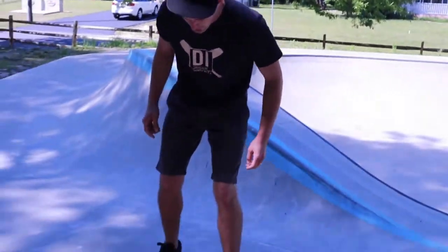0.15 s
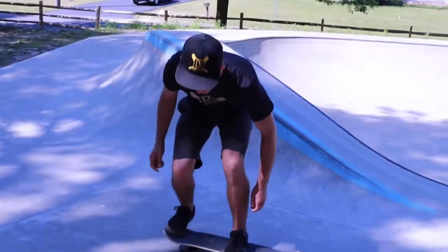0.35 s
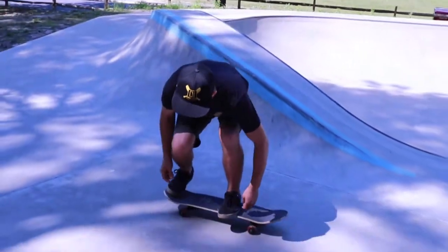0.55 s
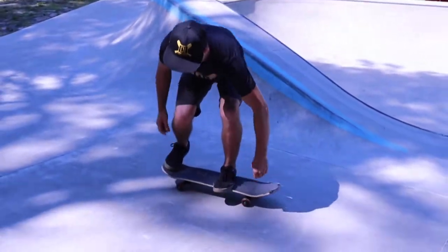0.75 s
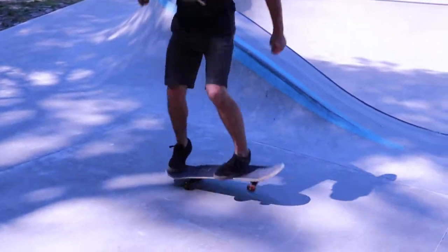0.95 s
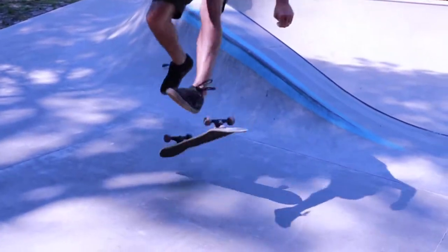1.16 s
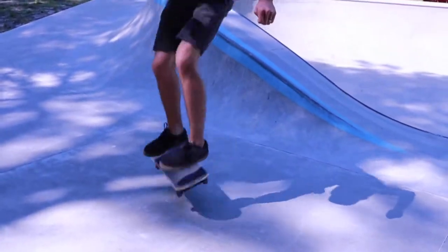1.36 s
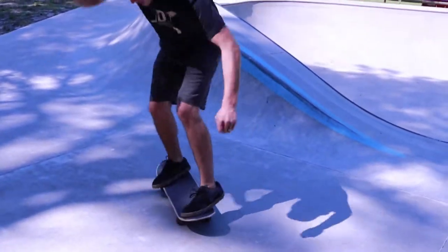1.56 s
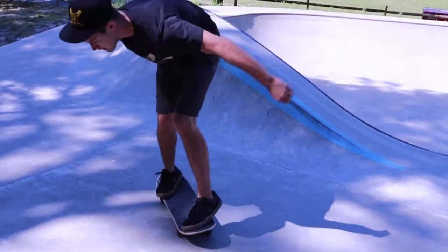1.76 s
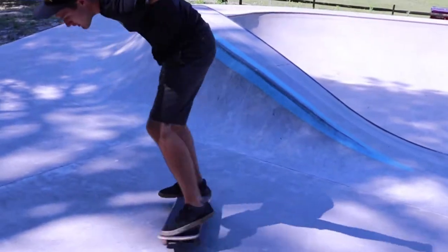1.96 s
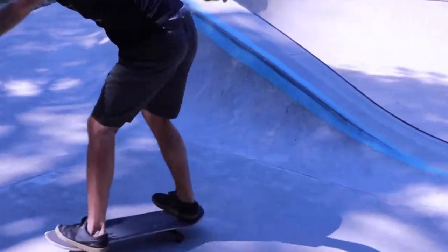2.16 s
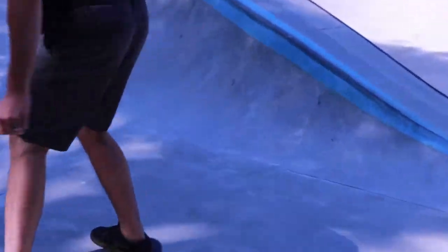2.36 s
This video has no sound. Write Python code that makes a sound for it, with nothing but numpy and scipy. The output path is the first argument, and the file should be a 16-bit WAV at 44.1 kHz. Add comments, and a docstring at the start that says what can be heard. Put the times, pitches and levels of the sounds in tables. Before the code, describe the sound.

A skateboard cracks off concrete, slaps down in a rapid clatter, knocks again and squeaks briefly

```python
"""In a concrete bowl, a skater pops a flip and lands it, a few metres from a microphone whose input clips.
Blows ring the modes of the wooden deck; granular noise gives shoe scuffs and late swells of the echo.
The sole creaks on the grip tape, grit ticks as noise bursts, rubber chirps as gliding tones, and a wheel
squeals as stick-slip partials. The park also scatters the board's sound back through a diffuse tail;
wheels roll softly and wind rumbles, both as shaped noise over hiss."""
import sys
import numpy as np
from scipy import signal
from scipy.fft import rfft, irfft
from scipy.io import wavfile
from scipy.ndimage import uniform_filter1d

SR = 44100
rng = np.random.default_rng(int(sys.argv[2]) if len(sys.argv) > 2 else 0)


def wav_record(signal):
    """Record a signal, one row per channel, as 16-bit PCM in the file named by sys.argv[1]."""
    frames = np.transpose(np.atleast_2d(signal))
    bounded = np.clip(frames, -1, 1)
    # unit amplitude maps onto the largest positive 16-bit level
    quanta = np.round(bounded * 32767).astype(np.int16)
    wavfile.write(sys.argv[1], SR, quanta)


def gain_from_db(level_db):
    """Turn a decibel level (scalar or array-like) into a linear amplitude factor."""
    decades = np.asarray(level_db, float) / 20
    return 10 ** decades


N = 106325  # length in samples


def colour(x, points):
    """Spectral shaping: filter x by (Hz, dB) points, 30 dB down beyond them, then set rms 1."""
    p = np.array(points, float)
    freqs = np.maximum(np.arange(len(x) // 2 + 1) * SR / len(x), 1)
    db = np.interp(np.log(freqs), np.log(p[:, 0]), p[:, 1], left=p[0, 1] - 30, right=p[-1, 1] - 30)
    y = irfft(rfft(x) * gain_from_db(db), len(x))
    return y / np.sqrt(np.mean(y ** 2))


def curve(points, col=1):
    """Linear interpolation in time: straight lines between table rows."""
    p = np.array(points, float)
    return np.interp(np.arange(N) / SR, p[:, 0], p[:, col])


def walk(rate):
    """Smoothed random modulation: levels drawn rate times a second and slewed, spread near 0.56."""
    hold = int(SR / rate)
    steps = np.repeat(rng.standard_normal(N // hold + 1), hold)
    return 0.75 * uniform_filter1d(uniform_filter1d(steps, hold), hold)[:N]


def add(out, s, x):
    """Superposition: mix x in at time s."""
    i = max(int(s * SR), 0)
    out[i:i + len(x)] += x[:N - i]


# Treble spectrum of the input hiss and the noisy swells.
# Each row: frequency in Hz, relative level in dB.
SIZZLE_SPECTRUM = [(6000, -17), (8000, -6.5), (10500, -1.5), (14000, -4), (16500, -14)]
HISS_DB = -67.5


def input_hiss():
    """Stationary noise: the steady hiss of the input."""
    return gain_from_db(HISS_DB) * colour(rng.standard_normal(N), SIZZLE_SPECTRUM)


# Spectrum of wind on the microphone. Each row: frequency in Hz, relative level in dB.
WIND_SPECTRUM = [(15, 10.5), (33, 1), (70, -0.5), (111, -9.5), (250, -22), (320, -77)]
# Rise and fall of the gusts. Each row: time in seconds, level in dB before the random wavering.
GUST_LEVELS = [(0, -38.5), (.8, -34.5), (.94, -46), (1.06, -38.5), (1.14, -26), (1.3, -32), (1.4, -26),
               (1.57, -36.5), (1.9, -41), (2.41, -42)]


def wind():
    """Turbulent pressure on the microphone: low-frequency noise whose level follows the gusts."""
    noise = colour(rng.standard_normal(N), WIND_SPECTRUM)
    return noise * gain_from_db(curve(GUST_LEVELS) + 2.3 * walk(12.4))


# Spectrum of rolling and distant hum. Each row: frequency in Hz, relative level in dB.
ROLL_SPECTRUM = [(76, -3.5), (130, -11.5), (237, -15.5), (391, -14.5), (699, -18), (982, -13.5),
                 (1590, -22), (15600, -50.5)]
# Loudness of the rolling and hum. Each row: time in seconds, level in dB before the random wavering.
ROLL_LEVELS = [(0, -43.5), (.6, -47.5), (1.4, -48.5), (1.85, -43.5), (2.41, -43)]


def rolling():
    """Broadband rolling noise and distant hum of the park, wavering separately in two bands."""
    noise = colour(rng.standard_normal(N), ROLL_SPECTRUM)
    low = signal.sosfiltfilt(signal.butter(2, 1600, fs=SR, output="sos"), noise)
    high = noise - low
    wavering = low * gain_from_db(1.2 * walk(22.3)) + high * gain_from_db(2.4 * walk(13.5))
    return gain_from_db(curve(ROLL_LEVELS)) * wavering


ECHO_PEAK_S, ECHO_T60_S, ECHO_DB = 0.1, 0.58, -33


def echo(x):
    """Diffuse scattering: far ramps, trees and houses return the sound late, swelling before it dies."""
    t = np.arange(SR // 2) / SR
    noise = colour(rng.standard_normal(len(t)), [(200, -2), (15000, -2)])
    swell = np.minimum(t / ECHO_PEAK_S, 1) ** 2
    tail = noise * swell * 1000. ** (-t / ECHO_T60_S)
    tail = tail / np.sqrt(np.sum(tail ** 2))  # unit energy
    return gain_from_db(ECHO_DB) * signal.fftconvolve(x, tail)[:N]


# Spectrum heard through the grip tape. Each row: frequency in Hz, relative level in dB.
GRIP_SPECTRUM = [(1700, -22), (2500, 0), (3100, -1), (4300, -12), (5400, -8), (6600, -16), (8000, -30)]
CREAK_START_S, CREAK_LENGTH_S, CREAK_DB = .928, .05, -41
CREAK_FROM_HZ, CREAK_TO_HZ = 270, 800  # slip rate, before its random wobble


def creak():
    """Stick-slip friction: before the pop the sole creaks on the tape in uneven, quickening slips."""
    out, u = np.zeros(N), np.linspace(0, 1, int(CREAK_LENGTH_S * SR))
    rate_hz = (CREAK_FROM_HZ + (CREAK_TO_HZ - CREAK_FROM_HZ) * u) * gain_from_db(walk(330)[:len(u)])
    turns = np.cumsum(rate_hz) / SR
    pulses = np.diff(np.floor(turns + .9), prepend=0)  # one pulse per completed turn
    slips = pulses * gain_from_db(2 * rng.standard_normal(len(u)))
    add(out, CREAK_START_S, gain_from_db(CREAK_DB) * colour(slips, GRIP_SPECTRUM) * np.sin(np.pi * u))
    return out


# Grit ticks. Each row: start in seconds, level in dB, centre frequency in Hz.
GRIT_TICKS = [(0.566, -30.5, 2980), (0.966, -29, 1520), (.977, -37, 12500), (.989, -40, 11000),
              (1.006, -32, 11500), (1.016, -28, 4870), (1.039, -49, 9000), (1.054, -41, 3300),
              (1.402, -43, 4500), (1.612, -28.5, 4500), (1.658, -18, 1300), (1.783, -29, 1340),
              (1.838, -27, 1470), (1.876, -27, 2880)]
TICK_DECAY_S, TICK_WIDTH = 0.0013, 0.94  # flat band reaches centre times and over TICK_WIDTH


def ticks():
    """Impulsive excitation: band-limited noise bursts that decay exponentially."""
    out, t = np.zeros(N), np.arange(800) / SR
    noises = rng.standard_normal((len(GRIT_TICKS), len(t)))
    envelope = np.exp(-t / TICK_DECAY_S) * np.minimum(t * SR / 10, 1)  # 10-sample onset
    for (s, db, hz), noise in zip(GRIT_TICKS, noises):
        band = colour(noise, [(hz / 2, -20), (hz * TICK_WIDTH, 0), (hz / TICK_WIDTH, 0), (hz * 2, -24)])
        add(out, s, gain_from_db(db) * band * envelope)
    return out


# Rubber chirps and one dull tap.
# Each row: start in seconds, length in seconds, first frequency in Hz, last frequency in Hz,
# level in dB before the random flicker.
RUBBER_CHIRPS = [(1.7111, 0.002, 1140, 1130, 1), (1.927, 0.0233, 1954, 2680, -20)]


def chirps():
    """Frequency glide: slipping rubber whistles briefly upward; a very short glide is a dull tap."""
    out = np.zeros(N)
    for s, length, from_hz, to_hz, db in RUBBER_CHIRPS:
        u = np.linspace(0, 1, int(length * SR))
        phase = 2 * np.pi * np.cumsum(from_hz + (to_hz - from_hz) * u) / SR
        flicker = gain_from_db(3.9 * walk(560)[:len(u)])
        add(out, s, gain_from_db(db) * np.sin(np.pi * u) ** 2 * np.sin(phase) * flicker)
    return out


# Spectrum heard through the deck. Each row: frequency in Hz, relative level in dB.
RATTLE_SPECTRUM = [(250, -9.5), (450, -5), (1150, -1.5), (1700, -1.5), (2500, -18.5), (5800, -25)]
# Shoe scuffs, and noisy swells of the echo after the pop, the landing and the squeal.
# Each row: start in seconds, length in seconds, share of the length spent swelling,
# then levels in dB of the grip tape, deck and treble layers before their random flicker.
NOISY_SWELLS = [(0.295, 0.073, 0.58, -51, -61, -66), (0.433, 0.054, .5, -55.5, -68.5, -69),
                (0.943, 0.062, 0.46, -37.5, -40, -54), (0.976, 0.25, 0.13, -46.5, -44.5, -56.5),
                (1.084, 0.042, 0.24, -26.5, -25.5, -39), (1.099, 0.15, 0.15, -73, -33, -69),
                (1.464, 0.091, 0.65, -35, -18.5, -44), (1.558, 0.15, 0.47, -44, -36, -53.5),
                (1.701, 0.097, 0.11, -45, -40, -58), (1.855, 0.065, 0.62, -41, -38, -62),
                (1.905, 0.06, 0.55, -35, -40, -41.5), (1.945, 0.11, 0.36, -66, -31.5, -55.5),
                (2.048, 0.052, 0.87, -41.5, -36, -49.5), (2.171, 0.036, 0.18, -41, -24, -55),
                (2.202, 0.15, 0.53, -48, -39.5, -69)]
GRAINS_PER_S, GRAIN_SPREAD_DB = 4500, 3.5  # mean rate; scale of the exponential spread


def noise_grains():
    """Poisson-like excitation: dense random impulses of either sign and uneven strength."""
    hits = rng.random(N) < GRAINS_PER_S / SR
    signs = rng.choice([-1, 1], N)
    return hits * signs * gain_from_db(GRAIN_SPREAD_DB * np.minimum(rng.exponential(size=N), 6.5))


def noisy_swells():
    """Granular synthesis: grains in three spectral layers swell and fade as scuffs and late echoes."""
    out = np.zeros(N)
    spectra = (GRIP_SPECTRUM, RATTLE_SPECTRUM, SIZZLE_SPECTRUM)
    layers = [colour(noise_grains(), spectrum) * gain_from_db(2.84 * walk(120)) for spectrum in spectra]
    for s, length, swell, *dbs in NOISY_SWELLS:
        i, u = max(int(s * SR), 0), np.linspace(0, 1, int(length * SR))
        peak = np.clip(swell, .05, .9)
        env = np.sin(np.pi / 2 * np.minimum(u / peak, (1 - u) / (1 - peak)))[:N - i]
        mix = sum(gain_from_db(db) * layer[i:i + len(env)] for db, layer in zip(dbs, layers))
        add(out, s, env * mix)
    return out


# Course of the wheel squeal. Each row: time in seconds, slip rate in Hz before jitter, level in dB.
SQUEAL_COURSE = [(2.156, 952.4, -31), (2.161, 935, -7.5), (2.170, 933, -0.5), (2.181, 877, -6.5),
                 (2.188, 865, -39)]
# Squeal partials from the first up. Each row: early level in dB, late level in dB, before any flicker.
SQUEAL_PARTIALS = [(2, -6), (-10, 2), (-11, -15), (-12, -7), (-11, -21), (-7, -20), (-15, -25), (-17, -22),
                   (-13, -24)]
SQUEAL_TURNS_S, SQUEAL_JITTER = 2.1695, .035  # middle of the early-to-late change; scale of rate jitter
SQUEAL_HISS_DB, SQUEAL_FLICKER_DB = -3, 5  # early hiss; scale of flicker from the third partial up


def squeal():
    """Stick-slip oscillation: a skidding wheel gives hiss and partials that shift weight to the second."""
    t = np.arange(N) / SR
    rate_hz = curve(SQUEAL_COURSE) * (1 + SQUEAL_JITTER * walk(900))
    phase = 2 * np.pi * np.cumsum(rate_hz) / SR
    late = np.clip((t - SQUEAL_TURNS_S) / 0.0056 + .5, 0, 1)
    start_phase = 2 * np.pi * rng.random(len(SQUEAL_PARTIALS))
    stack = np.zeros(N)
    for k, (early_db, late_db) in enumerate(SQUEAL_PARTIALS):
        flicker_db = SQUEAL_FLICKER_DB * min(k / 2, 1) * walk(300)  # the first partial has no flicker
        level = gain_from_db(early_db + (late_db - early_db) * late + flicker_db)
        stack += level * np.sin((k + 1) * phase + start_phase[k])
    noise = colour(rng.standard_normal(N), [(1500, 9.5), (16000, -6.0)])
    hiss = gain_from_db(SQUEAL_HISS_DB - 12 * late) * noise
    sounding = (t > SQUEAL_COURSE[0][0]) * (t < SQUEAL_COURSE[-1][0])
    return gain_from_db(curve(SQUEAL_COURSE, col=2)) * (stack + hiss) * sounding


# Modes of the wooden deck. Each row: frequency in Hz, relative level in dB, before random scatter.
DECK_MODES = [(390, -13), (515, 3.5), (580, -2.5), (775, -1.5), (920, -2.5), (1085, 1.5), (1200, 0.5),
              (1300, -1.5), (1630, 0), (2090, -1), (2630, -8), (3350, -2), (4700, -5.5)]
# Blows on the deck. Each row: start in seconds, ringing level in dB, centre frequency in Hz,
# crack level in dB.
DECK_BLOWS = [(1.0818, -16.5, 2200, -1.5), (1.0826, -3.5, 690, -42), (1.4664, -19.5, 1480, -43),
              (1.4834, -4.5, 2280, 0.5), (1.4867, -2, 970, -7), (1.502, -15, 1220, -29),
              (1.5074, -18, 1220, -28), (1.5138, -0.5, 1090, -8.5), (1.519, 1, 1290, -14),
              (1.524, -7.5, 1090, -16), (1.533, -14.5, 1360, -31), (1.5389, -18.5, 1020, -28),
              (1.5436, -12.5, 1170, -33), (1.723, -22, 950, -38), (1.904, -24.5, 1750, -35),
              (1.9768, -6.5, 980, -28), (1.9844, 0, 1240, -7), (1.989, -12, 630, -25),
              (2.0027, -31.5, 1470, -43), (2.1386, -10.5, 1640, -7.5), (2.1431, -17.5, 1800, -2.5),
              (2.1467, -6, 616, -8.5), (2.154, -11.5, 1480, -6)]
# Spectrum of the crack. Each row: frequency in Hz, relative level in dB.
CRACK_SPECTRUM = [(880, -13), (1500, 1.5), (4580, -4), (7000, -21.5), (9500, -13), (15600, -22.5)]
MODE_SCATTER_DB, MODE_DETUNE = 2.5, 0.026  # standard deviations; detuning as a share of frequency
DECK_T60_S, T60_SLOPE = 0.029, -0.42  # at 1 kHz; power of frequency
FOCUS_DB_PER_OCT2 = 5.5  # a blow favours modes near its centre
CHATTER_DECAY_S, CRACK_DECAY_S = 0.00028, 0.0022


def blows():
    """Modal synthesis: chattering contacts ring damped deck modes near a centre, with a treble crack."""
    out, t = np.zeros(N), np.arange(4000) / SR
    hz, db = np.array(DECK_MODES, float).T[:, :, None]
    decay = 1000. ** (-t / (DECK_T60_S * (hz / 1000) ** T60_SLOPE))
    chance = rng.standard_normal((len(DECK_BLOWS), 3, len(DECK_MODES), 1))
    chatter = rng.standard_normal((len(DECK_BLOWS), 300)) * np.exp(-t[:300] / CHATTER_DECAY_S)
    noise = colour(rng.standard_normal(N), CRACK_SPECTRUM)
    crack_env = np.exp(-t / CRACK_DECAY_S) * np.minimum(t * SR / 8, 1)  # 8-sample onset
    for blow, (scatter, detune, sign), push in zip(DECK_BLOWS, chance, chatter):
        s, level_db, centre_hz, crack_db = blow
        focus_db = FOCUS_DB_PER_OCT2 * np.log2(hz / centre_hz) ** 2
        gain = np.sign(sign) * gain_from_db(db + MODE_SCATTER_DB * scatter - focus_db)
        tones = np.sin(2 * np.pi * hz * (1 + MODE_DETUNE * detune) * t)
        ring = np.convolve(np.sum(gain * tones * decay, axis=0), push)
        add(out, s, gain_from_db(level_db) * ring / np.sqrt(np.mean(ring[:300] ** 2)))  # level of first 300 samples
        i = int(s * SR)
        add(out, s, gain_from_db(crack_db) * noise[i:i + len(t)] * crack_env)
    return out


BOARD_LOW_HZ = 320  # the small deck radiates no bass


def scene():
    """Superposition of sources: board sounds and their echo over friction noise, rolling, wind and hiss."""
    highpass = signal.butter(2, BOARD_LOW_HZ, "high", fs=SR, output="sos")
    board = signal.sosfilt(highpass, blows() + ticks() + chirps()) + squeal()
    grains_and_creak = noisy_swells() + creak()
    background = rolling() + wind() + input_hiss()
    return (board + echo(board) + grains_and_creak + background)[None]


CLIP_KNEE = 7.0  # exponent: higher bends later and more sharply


def low_pass(x):
    """Removes everything above the highest recorded frequency."""
    return signal.sosfilt(signal.butter(12, 15700, fs=SR, output="sos"), x)


def record(dry):
    """Saturation: the input clips smoothly near full scale."""
    clipped = dry / (1 + np.abs(dry) ** CLIP_KNEE) ** (1 / CLIP_KNEE)
    return low_pass(clipped)


dry = scene()
out = record(dry)
wav_record(out)
```